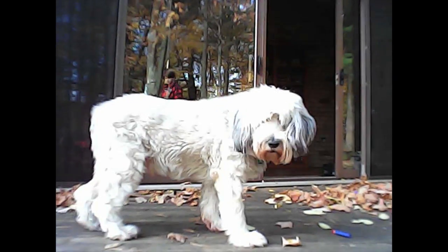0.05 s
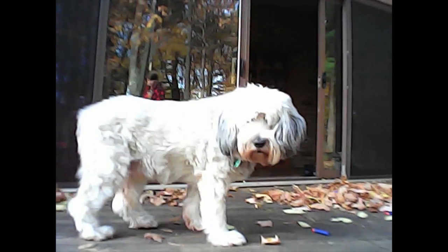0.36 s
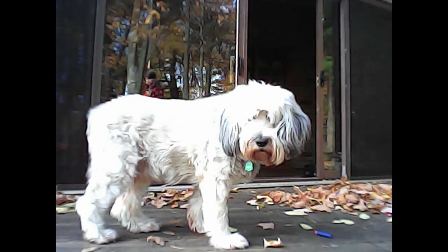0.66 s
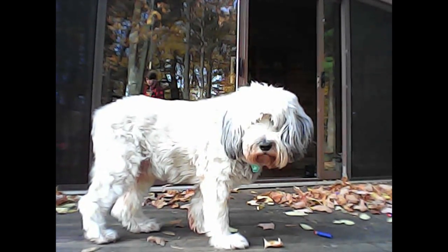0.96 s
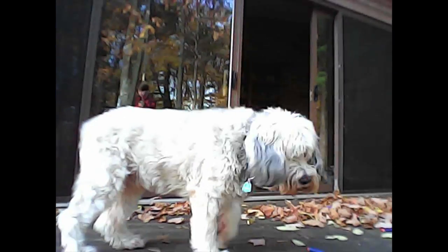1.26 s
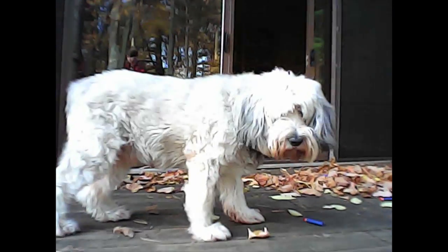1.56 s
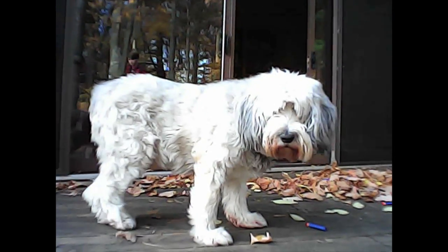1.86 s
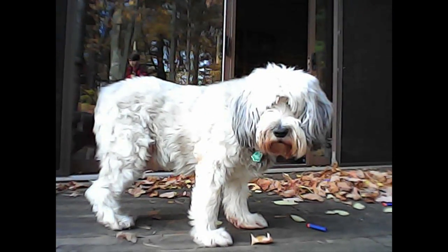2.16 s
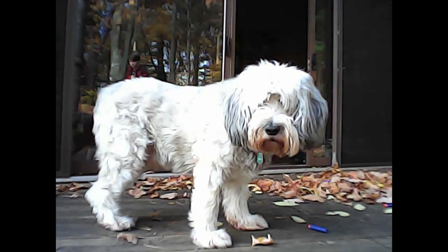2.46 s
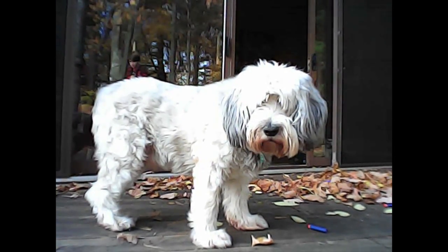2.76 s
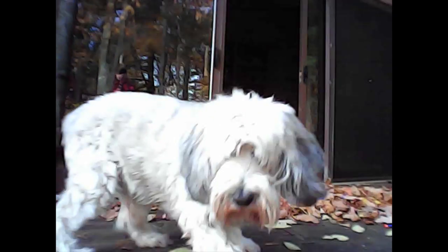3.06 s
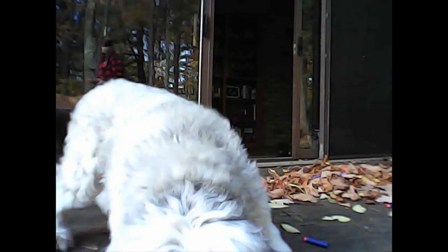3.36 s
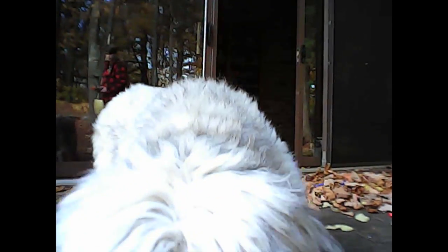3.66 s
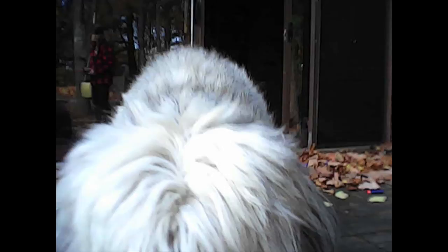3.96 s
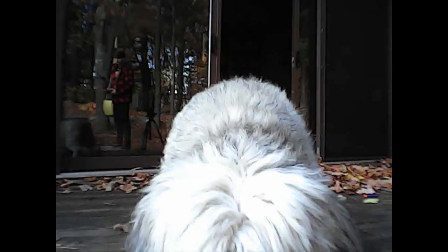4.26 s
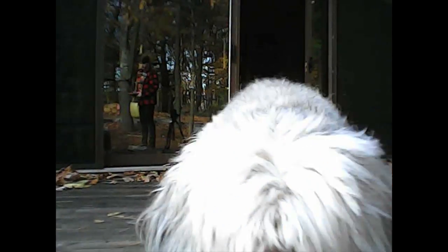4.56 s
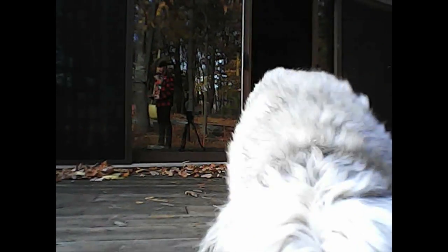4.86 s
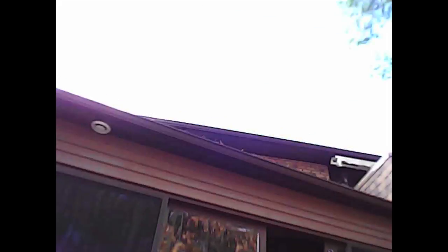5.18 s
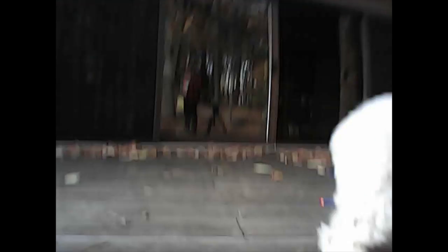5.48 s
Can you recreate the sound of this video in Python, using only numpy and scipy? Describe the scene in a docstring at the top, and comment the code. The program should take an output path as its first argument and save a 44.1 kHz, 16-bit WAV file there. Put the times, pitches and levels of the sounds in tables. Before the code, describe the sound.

Close, stop-and-go whirring of a remote-controlled toy, with chattering gears, rumbling wheels, plastic knocks and a faint electronic buzz in the pauses.

```python
"""A small remote-controlled toy vehicle drives over a wooden deck, heard by its own microphone.
First its two geared motors twitch, as the throttle arrives in pulses on the beat of the radio control.
Then, in short bursts, they spin up with a whine and coast: gears rattle the plastic shell, wheels rumble,
the chassis knocks, and in the pauses the electronics buzz faintly. After a light scuff comes the longest
run, in which the microphone overloads at full speed; a few last stabs of the throttle end the drive."""
import sys
import numpy as np
from scipy import signal
from scipy.fft import rfft, irfft, next_fast_len
from scipy.io import wavfile
from scipy.ndimage import uniform_filter1d, map_coordinates

SR = 44100
rng = np.random.default_rng(int(sys.argv[2]) if len(sys.argv) > 2 else 0)


def output_pcm(signal):
    """Save a mono or channel-first signal as 16-bit PCM at the path in sys.argv[1].

    Samples are clipped to [-1, 1] before scaling.
    """
    pcm = np.clip(np.atleast_2d(signal).T, -1, 1) * 32767
    wavfile.write(sys.argv[1], SR, np.round(pcm).astype(np.int16))


N = 243431
BEAT_HZ = 23.8  # pulse rate of the radio control

# throttle presses: on_s, off_s, target_tooth_hz, duty_fraction, whine_db, overtone_db
THROTTLE_PRESSES = [(.345, 0.437, 3200, .7, 1.5, -3.5), (1.226, 1.387, 2853, .5, 2, 1),
                    (1.397, 1.455, 3315, 0.61, -0.5, 0.5), (2.876, 3.08, 2849, 0.62, -0.5, 0.5),
                    (3.083, 3.194, 3450, .7, 0.5, -6.5), (3.946, 4.1, 2453, 1, -0.5, -6.5),
                    (4.099, 4.302, 2757, 1, -4, 1.5), (4.3, 4.969, 2689, 1, -3.5, -7.5),
                    (5.114, 5.142, 2990, 1, -3, 4), (5.16, 5.192, 2752, 1, 3, -8.5),
                    (5.219, 5.294, 4260, 0.97, 1.5, -8.5), (5.385, 5.4, 1599, 1, -1, 1.5)]
# spells of gear rattle: start_s, coast_s, halt_s, driven_db, coasting_db
RATTLE_RUNS = [(0.38, 0.442, 0.49, -27.5, -35), (1.315, 1.471, 1.626, -20, -22.5),
               (2.906, 2.925, 3.49, -23.5, -28), (2.953, 3.225, 3.447, -20.5, -22.5),
               (3.378, 3.42, 3.465, -21, -27.5), (3.865, 3.94, 3.97, -18.5, -19),
               (3.959, 4.962, 5.09, -18, -21), (5.117, 5.318, 5.385, -18.5, -21.5),
               (5.392, 5.417, 5.428, -21, -28)]
# trains of motor jerks, one jerk a beat: start_s, end_s, first_level_db, change_db_per_s
JERK_TRAINS = [(-.011, .35, -22, -17), (0.373, .43, -22.5, 81), (1.196, 1.21, -23, 8),
               (1.223, 1.33, -17.5, 11), (2.882, 2.98, -19, 12), (5.511, 5.52, -8, 5)]
# radiation of the whine by the shell: frequency_hz, gain_db
SHELL_RADIATION = [(500, -23), (1000, -15.5), (1400, 2), (2000, 4), (2700, 2), (3100, -2), (3700, -4),
                   (4800, -4), (5600, -11), (7000, -39)]
# resonances of the plastic shell: frequency_hz, width_hz, gain_db
SHELL_MODES = [(821, 7.7, -1.5), (1190, 9.9, 0), (1327, 25, 6.5), (1823, 250, -1), (2373, 77, 2.5),
               (2690, 23, -1), (2790, 78, 1.5), (3205, 24, -5), (4320, 36, 7), (5150, 55, -3.5),
               (6300, 140, -3)]
# spectra of slow gears, fast gears and gears taking up their play: frequency_hz, gain_db
SLOW_GEAR_SPECTRUM = [(100, -8), (250, -15.5), (500, -7.5), (800, 1.5), (1300, -4.5), (2000, -4.5),
                      (2700, -12), (3400, -17), (5000, -21.5), (7000, -37)]
FAST_GEAR_SPECTRUM = [(100, -7), (200, -0.5), (400, -2.5), (750, 4), (1200, -2.5), (1800, -1.5),
                      (2500, -12), (3200, -9.5), (5000, -12.5), (7000, -24)]
BACKLASH_SPECTRUM = [(150, -15.5), (400, -4), (700, 5), (1000, 5), (1500, 1.5), (2600, -3.5), (3300, -12),
                     (5000, -19), (7000, -34.5)]
# spells of rolling: start_s, stop_s, level_db
WHEEL_ROLLS = [(-.06, 0.496, -39.5), (1.228, 1.603, -28.5), (2.91, 3.47, -28.5), (3.924, 4.322, -26),
               (4.263, 5.386, -22.5)]
# lurches of the chassis over the boards: centre_s, level_db
CHASSIS_LURCHES = [(.48, -34), (1.46, -26.5), (3.001, -29), (3.24, -21), (3.4, -33), (3.68, -41),
                   (5.0, -18.5), (5.07, -19), (5.18, -23.5), (5.256, -13)]
# spectrum of wheels on the deck: frequency_hz, gain_db
RUMBLE_SPECTRUM = [(8.8, -54), (15, -5.5), (54, 0.5), (80, -7), (108, 0), (151, -10), (216, -16),
                   (400, -11.5), (520, -11.5), (880, -120)]
# bumps of the chassis: start_s, level_db, thud_offset_db
CHASSIS_KNOCKS = [(0.434, -38, -9), (0.543, -45, 10), (1.826, -39, -20), (1.959, -41, -7),
                  (3.381, -14.5, 0), (3.417, -21, -13.5), (3.464, -21, -13), (3.476, -25, -4),
                  (3.5, -34, -12), (3.553, -41.5, 0.5), (3.63, -30.5, 0), (5.064, -13.5, -12.5),
                  (5.387, -23.5, -21), (5.45, -29, 1)]
# spectra of the bright and the dull part of a bump: frequency_hz, gain_db
TICK_SPECTRUM = [(500, -4.5), (1500, 8), (3500, 8.5), (6000, 0), (8000, -33)]
THUD_SPECTRUM = [(40, 2), (130, 2), (350, -4), (1200, -8.5), (3000, -26.5)]
# one brush against the shell: start_s, stop_s, level_db
SHELL_SCUFF = (3.635, 3.735, -47.5)
# resonant bands of the electrical buzz: frequency_hz, width_hz, gain_db
BUZZ_BANDS = [(1010, 110, -2.5), (1030, 220, -2.5), (1323, 130, 3.5)]
# steady tones of the electronics: pitch_hz, level_db
HUM_TONES = [(119.5, -52), (301, -62.5), (457, -64.5), (5560, -67)]
# spectrum of the electronic hiss: frequency_hz, gain_db
HISS_SPECTRUM = [(15, 0), (60, -10), (124, -14), (200, -16), (550, -21.5), (950, -15.5), (1350, -16.5),
                 (1600, -23.5), (2200, -30.5), (4400, -33.5), (7000, -38.5)]


def motors():
    """Superposition: two gear trains follow the same current, one a little slower than the other."""
    drive = np.hypot(rattle_force(), amp(-13) * jerks(rise_s=0.0041, hold_s=0.018, t60_s=0.083))
    faster = gear_train(spin(ratio=1, hunt=0.018, hunt_hz=26, fade_db=2, fade_hz=30), drive,
                        flutter=0.017, stagger=0.026, waver_db=3, grit=1.58, shake_db=2.25, slow_db=-6.5,
                        fast_db=-5, ring_db=-5.5, whine_db=-2, third_db=-8, speed_db=4.5)
    slower = gear_train(spin(ratio=0.905, hunt=0.007, hunt_hz=20, fade_db=3.5, fade_hz=25), drive,
                        flutter=0.018, stagger=0.03, waver_db=3.5, grit=1.23, shake_db=2.5, slow_db=-8.5,
                        fast_db=-3, ring_db=-1.5, whine_db=-6, third_db=-4, speed_db=2.5)
    return faster + slower


def gear_train(motion, drive, flutter, stagger, waver_db, grit, shake_db,
               slow_db, fast_db, ring_db, whine_db, third_db, speed_db):
    """Gear meshing: periodic tooth contact gives a whine, and uneven impacts rattle the shell."""
    tooth_hz, tone_db, overtone_db = motion
    speed = np.clip((tooth_hz - 800) / 1800, 0, 1)
    force = drive * amp(speed_db * speed)  # fast teeth hit harder
    # play in the gears makes the tooth rate unsteady, most of all at low speed
    play = (1 - 0.5 * speed) * (flutter * wobble(300) + stagger * wobble(900))
    teeth = np.cumsum(tooth_hz * (1 + play)) / SR
    phase = 2 * np.pi * teeth
    bite = amp(overtone_db + 1.24 * wobble(70))  # the overtones come and go as the teeth seat
    mesh = np.sin(phase) + bite * (np.sin(2 * phase) + amp(third_db) * np.sin(3 * phase))
    whine = force * coloured(mesh, SHELL_RADIATION) * amp(tone_db + whine_db + waver_db * wobble(140))
    # every tooth strikes with its own force, and the flanks scrape in between
    strikes = np.diff(np.floor(teeth), prepend=0) * rng.standard_normal(N)
    scrape = grit * rng.standard_normal(N)
    contact = (unit(strikes / np.sqrt(tooth_hz)) + scrape) * amp(shake_db * wobble(110))
    grind = force * amp(slow_db) * np.sqrt(1 - speed) * unit(coloured(contact, SLOW_GEAR_SPECTRUM))
    rush = force * amp(fast_db) * np.sqrt(speed) * unit(coloured(contact, FAST_GEAR_SPECTRUM))
    ring = amp(ring_db) * resonate(grind, SHELL_MODES)  # slow, heavy blows ring the shell
    return whine + grind + rush + ring


def spin(ratio, hunt, hunt_hz, fade_db, fade_hz, inertia_s=0.13, crawl_hz=450.6):
    """Inertia: motor speed lags the pulsed current. Gives tooth rate, whine level and overtone level."""
    t = clock()
    target_hz, tone_db, overtone_db = np.zeros((3, N))
    for on, off, hz, duty, whine_db, octave_db in THROTTLE_PRESSES:
        powered = (t >= on) & (t < off) & ((t - on) * BEAT_HZ % 1 < duty)
        target_hz[powered] = hz
        tone_db[t >= on], overtone_db[t >= on] = whine_db, octave_db
    step = 1 / (inertia_s * SR)
    lagged_hz = np.maximum(signal.lfilter([step], [1, step - 1], target_hz), crawl_hz)
    tone_db -= 4.5 * (target_hz == 0)  # unloaded teeth sing less
    tone_db += 22 * np.minimum(np.log2(lagged_hz / 1092), 0)  # a slow whine sinks into the rattle
    tooth_hz = ratio * lagged_hz * (1 + hunt * wobble(hunt_hz))
    return tooth_hz, tone_db + fade_db * wobble(fade_hz), overtone_db


def rattle_force(ease_s=0.005):
    """Impact force follows load: gears rattle hard when driven, less when coasting, and stop at a halt."""
    power = np.zeros(N)
    for start, coast, halt, driven_db, coasting_db in RATTLE_RUNS:
        load = np.exp(-np.maximum(clock() - coast, 0) / ease_s)
        level = amp(coasting_db + (driven_db - coasting_db) * load)
        power += (level * swell(start, halt, rise_s=0.012, fall_db_per_s=263.5)) ** 2
    return np.sqrt(power)


def jerks(rise_s, hold_s, t60_s):
    """Frictional damping: the envelope of gears that each pulse of current spins for only a moment."""
    power = np.zeros(N)
    for start, end, db, db_per_s in JERK_TRAINS:
        for onset in np.arange(start, end, 1 / BEAT_HZ):
            level = amp(db + db_per_s * (onset - start))
            power += (level * swell(onset, onset + hold_s, rise_s, 60 / t60_s)) ** 2
    return np.sqrt(power)


def twitches():
    """Backlash: at each jerk the gears take up their play in a clatter, and the shell rings on."""
    clatter = jerks(rise_s=0.0087, hold_s=0.012, t60_s=0.09) * noise(BACKLASH_SPECTRUM)
    return amp(-7) * clatter + resonate(clatter, SHELL_MODES)


def wheels(lurch_s=0.04):
    """Rolling noise: uneven boards shake the chassis, and harder at each lurch."""
    unevenness = amp(1.5 * wobble(25))
    rolling = sum((amp(db) * swell(start, stop, rise_s=0.14, fall_db_per_s=174.5)) ** 2
                  for start, stop, db in WHEEL_ROLLS)
    lurching = sum(amp(db) ** 2 / (1 + ((clock() - centre) / lurch_s) ** 2) ** 3
                   for centre, db in CHASSIS_LURCHES)
    return np.sqrt(rolling + lurching) * unit(noise(RUMBLE_SPECTRUM) * unevenness)


def knocks(tick_t60_s, thud_t60_s, tick_db, thud_db):
    """Damped impact: each bump of the chassis is a brief plastic tick over a longer, dull thud."""
    tick, thud = np.zeros((2, N))
    for start, db, thud_offset_db in CHASSIS_KNOCKS:
        age = np.clip(clock() - start + 0.00028, 0, 1)
        attack = np.clip(age / 0.0004, 0, 1)
        tick += attack * amp(db - 60 * age / tick_t60_s)
        thud += attack * amp(db + thud_offset_db - 60 * age / thud_t60_s)
    return amp(tick_db) * tick * noise(TICK_SPECTRUM) + amp(thud_db) * thud * noise(THUD_SPECTRUM)


def scuff():
    """Sliding friction: something brushes the plastic shell with a faint, bright noise."""
    start, stop, db = SHELL_SCUFF
    envelope = amp(db) * swell(start, stop, rise_s=0.0076, fall_db_per_s=304)
    return envelope * noise([(1500, -4), (3000, -2.5), (7000, -11)])


def electronics(pulse_hz, jitter, drift, gap_share, dip_db, buzz_db, hiss_db):
    """Amplitude modulation: a buzzing pulse train dips on each radio beat, over steady hum and hiss."""
    t = clock()
    in_gap = 1.0 * (t * BEAT_HZ % 1 < gap_share)
    gate = amp(dip_db * uniform_filter1d(in_gap, size=150))
    cycles = pulse_hz * t + jitter * wobble(400) + drift * wobble(30)
    pulses = np.diff(np.floor(cycles), prepend=np.floor(cycles[0]))
    buzz = unit(resonate(resonate(pulses, BUZZ_BANDS), BUZZ_BANDS))
    hum = sum(amp(db) * np.sqrt(2) * np.sin(2 * np.pi * hz * t + 0.27 * wobble(2.7))
              for hz, db in HUM_TONES)
    return amp(buzz_db) * buzz * gate + hum + amp(hiss_db) * noise(HISS_SPECTRUM)


def amp(db):
    """Amplitude ratio of a level in decibels."""
    return 10 ** (np.asarray(db) / 20)


def unit(x):
    """Normalisation to an rms of 1."""
    return x / np.sqrt(np.mean(x ** 2) + 1e-20)


def clock():
    """Uniform sampling: the time of each sample in seconds."""
    return np.arange(N) / SR


def swell(start, stop, rise_s, fall_db_per_s):
    """Envelope of linear attack, hold and exponential decay."""
    t = clock()
    return np.clip((t - start) / rise_s, 0, 1) * amp(-fall_db_per_s * np.clip(t - stop, 0, 1))


def wobble(rate_hz):
    """Random modulation: a smooth curve through rate_hz random values a second."""
    return map_coordinates(rng.standard_normal(int(N * rate_hz / SR) + 4), [clock() * rate_hz])


def filtered(x, response):
    """Linear filtering: the spectrum of x is multiplied by a frequency response."""
    size = next_fast_len(N + SR // 2)
    return irfft(rfft(x, size) * response(np.fft.rfftfreq(size, 1 / SR)), size)[:N]


def coloured(x, points):
    """Spectral shaping by (frequency_hz, gain_db) points, joined on a logarithmic frequency axis."""
    hz, db = np.transpose(points)
    return filtered(x, lambda f: amp(np.interp(np.log(f + 1), np.log(hz), db)))


def resonate(x, modes):
    """Modal superposition: x drives damped resonators in parallel."""
    return filtered(x, lambda f: sum(amp(db) * 1j * f * width / (hz * hz - f * f + 1j * f * width)
                                     for hz, width, db in modes))


def noise(points):
    """Spectrally shaped Gaussian noise with an rms of 1."""
    return unit(coloured(rng.standard_normal(N), points))


def scene():
    """Superposition: all sources add at the one microphone inside the toy."""
    bumps = knocks(tick_t60_s=0.028, thud_t60_s=0.17, tick_db=1, thud_db=0.5)
    idle = electronics(pulse_hz=465.3, jitter=0.053, drift=0.1, gap_share=0.22,
                       dip_db=-13, buzz_db=-45, hiss_db=-43.5)
    return (motors() + twitches() + wheels() + scuff() + bumps + idle)[None]


def record(dry):
    """Saturation and band limiting: the microphone clips the peaks, then a steep low-pass cuts treble."""
    ceiling, hardness = 0.295, 8
    cutoff_hz, stop_hz = 7000, 7950
    clipped = dry[0] / (1 + np.abs(dry[0] / ceiling) ** hardness) ** (1 / hardness)
    return filtered(clipped, lambda f: (f < stop_hz) / np.sqrt(1 + (f / cutoff_hz) ** 80))[None]


dry = scene()
out = record(dry)
output_pcm(out)
```